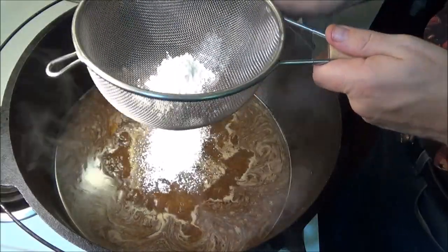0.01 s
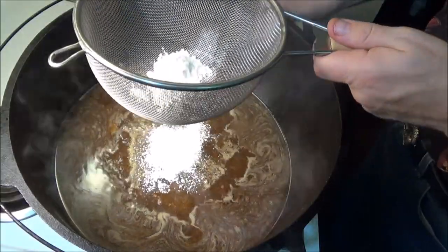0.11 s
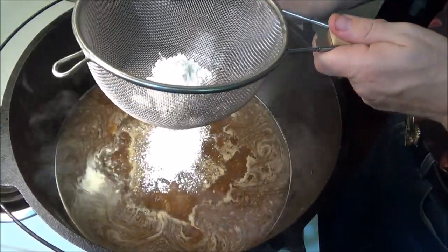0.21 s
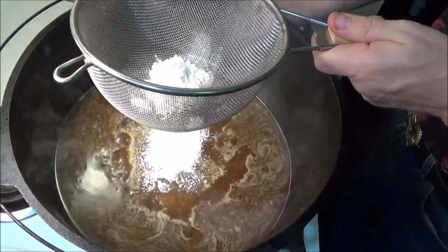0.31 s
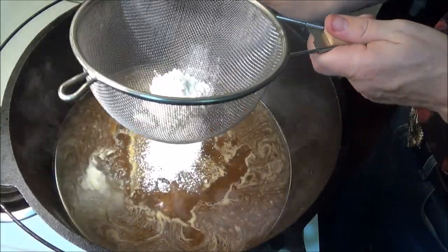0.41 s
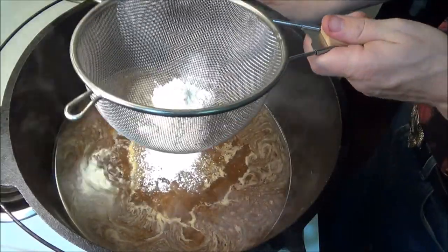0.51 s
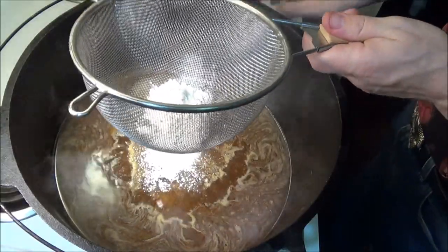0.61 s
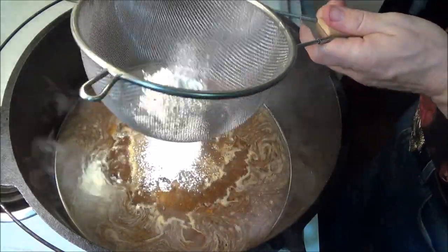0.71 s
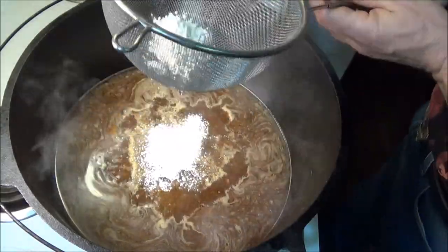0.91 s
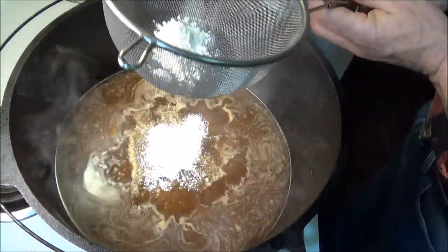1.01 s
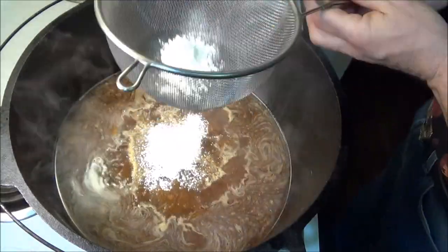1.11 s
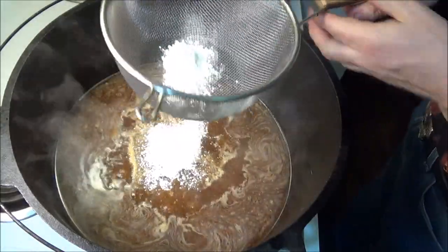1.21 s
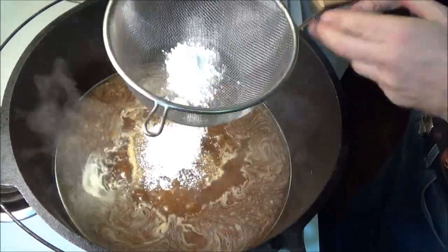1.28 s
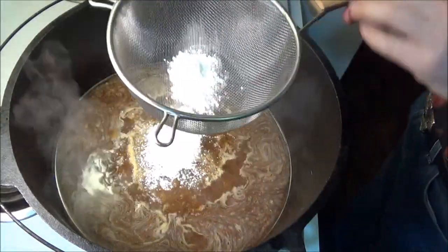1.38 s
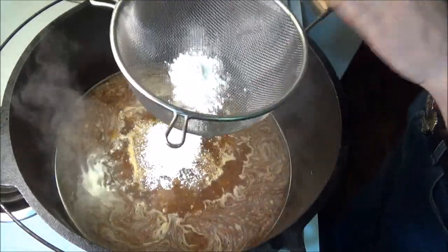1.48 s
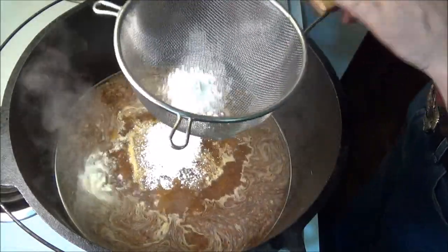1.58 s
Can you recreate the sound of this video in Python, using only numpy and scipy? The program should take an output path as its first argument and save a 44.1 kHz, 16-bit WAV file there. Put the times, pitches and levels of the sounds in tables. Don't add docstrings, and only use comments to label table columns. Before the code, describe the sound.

Two brief rattling knocks, the second darker, bounce around a kitchen; after a quiet gap with faint brushing, a hand lightly taps a mesh sieve near the stereo camera microphone above a gently hissing pot.

```python
import sys
import numpy as np
from scipy import signal
from scipy.fft import rfft, irfft
from scipy.io import wavfile
from scipy.ndimage import uniform_filter1d

SR = 44100
rng = np.random.default_rng(int(sys.argv[2]) if len(sys.argv) > 2 else 0)


def master_out(mix):
    frames = np.transpose(np.atleast_2d(mix))
    ceiling = np.clip(frames, -1, 1)
    pcm = np.round(ceiling * 32767).astype(np.int16)
    wavfile.write(sys.argv[1], SR, pcm)


def elevation(decibels):
    levels = np.asarray(decibels, float)
    return 10 ** (levels / 20)


N = 70560


def level(x, db):
    return x * elevation(db) / np.sqrt(np.mean(x ** 2) + 1e-30)


def read(table, hz):
    table = np.array(table, float)
    return np.interp(np.log(np.maximum(hz, 1)), np.log(table[:, 0]), table[:, 1])


def response(gain_db):
    cepstrum = irfft(gain_db * np.log(10) / 20)
    cepstrum[1:1024] *= 2
    cepstrum[1025:] = 0
    h = irfft(np.exp(rfft(cepstrum)))
    return h / np.sqrt(np.sum(h ** 2))


def bands(size):
    f = np.fft.rfftfreq(size, 1 / SR)
    noise = rfft(rng.standard_normal((2, size)))
    for hz in 25 * 2 ** np.arange(0, 9.6, 1 / 3):
        thirds_away = 3 * np.log2(np.maximum(f, 1) / hz)
        shape = np.cos(np.pi / 2 * np.clip(thirds_away, -1, 1)) ** 2
        yield hz, irfft(noise * shape, size)


def stereo(mid_side, side_db):
    return mid_side[0] + elevation(side_db) * mid_side[1] * np.array([[1], [-1]])


def walk(rate):
    hold = int(SR / rate)
    steps = np.repeat(rng.standard_normal(N // hold + 1), hold)
    return 4 / 3 * uniform_filter1d(uniform_filter1d(steps, hold), hold)[:N]


def grit(per_s, scatter_db):
    chance = rng.random((3, N))
    struck = chance[0] < per_s / SR
    sign = np.sign(chance[1] - .5)
    size = elevation(-scatter_db * np.log(chance[2] + 1e-9))
    return level(struck * sign * size, 0)


def wash(colour, db):
    flicker_db = .8
    # frequency in Hz, side against mid in dB.
    air_side = [(60, -34), (110, -20), (200, -22.5), (380, -14), (700, -12), (1290, -6), (2380, -5.5),
                (4400, -4.5), (8120, -11), (15000, -25)]
    total = 0
    for hz, pair in bands(N):
        gain = elevation(read(colour, hz) + flicker_db * walk(12.04))
        total = total + stereo(pair, read(air_side, hz) - 1.5) * gain
    return level(total, db)


def kitchen():
    # frequency in Hz, level in dB per Hz.
    rumble_colour = [(15, -59), (25, -35), (48, -8), (91, -11.5), (112, -9.5), (283, -4.5), (567, -10),
                     (772, -7.5), (2500, -20.5), (3250, -52), (5500, -120)]
    # frequency in Hz, level in dB per Hz.
    simmer_colour = [(1200, -8), (2500, 0), (5000, -3.5), (7500, -5), (10500, -0.5), (12000, -3),
                     (13500, -7), (15500, -11.5)]
    t = np.arange(N) / SR
    rumble = wash(rumble_colour + [(9000, -56)], -59.5)
    simmer = wash([(300, -50)] + simmer_colour, -64)
    hum = elevation(-71.5 + 3.5 * walk(8.04)) * np.sin(2 * np.pi * 60.5 * t)
    whine = elevation(-79) * np.sin(2 * np.pi * 15734 * t)
    return rumble + simmer + np.sqrt(2) * (hum + whine)


def room():
    # frequency in Hz, t60 in seconds.
    room_t60 = [(100, 1), (260, 0.96), (700, 0.24), (1840, 0.39), (4850, 0.3), (12800, 0.17)]
    # frequency in Hz, side against mid in dB.
    room_side = [(60, -18), (200, -15), (700, -8), (1300, -6.5), (2400, -9.5), (4400, -8), (8100, -11),
                 (15000, -20)]
    build_s = 0.0027
    late_db, late_t60_s, late_top_hz = -9.5, 0.84, 1490
    t = np.arange(SR) / SR

    def fade(t60):
        return 1000 ** (-t / t60) / np.sqrt(t60)

    tail = 0
    for hz, pair in bands(SR):
        late = elevation(late_db) / (1 + (hz / late_top_hz) ** 2) * fade(late_t60_s)
        decay = fade(read(room_t60, hz)) + late
        tail = tail + stereo(pair, read(room_side, hz) + 1.7) * decay
    tail = tail * (1 - np.exp(-t / build_s))
    return tail / np.sqrt(np.sum(tail ** 2) / 2)


def rubs():
    # middle in seconds, length in seconds, level in dB, centre in Hz, width in Hz.
    strokes = [
        (0.897, 0.018, -64.5, 10500, 4000),
        (0.968, 0.061, -67.5, 10400, 4000),
        (1.04, 0.11, -66.5, 2000, 4150),
        (1.106, .12, -66, 5040, 6000),
        (1.207, 0.12, -62.5, 8000, 7100),
        (1.323, 0.023, -65, 10000, 4000),
        (1.514, 0.054, -66.5, 9000, 6000),
    ]
    t = np.arange(N) / SR
    f = np.fft.rfftfreq(2048, 1 / SR)
    grain = grit(9000, 3)
    out = 0
    for middle, length, db, hz, width_hz in strokes:
        colour_db = -12 * np.minimum(((f - hz) / width_hz) ** 2, 4)
        swish = signal.fftconvolve(grain, response(colour_db))[:N]
        out = out + elevation(db) * swish * np.exp(-(2 * (t - middle) / length) ** 2)
    return out


def rings():
    # start in seconds, frequency in Hz, level in dB, swell in seconds, t60 in seconds.
    modes = [(.228, 494, -30, 0.018, 0.15), (.228, 2200, -33.5, 0.003, 0.086),
             (.232, 1696, -40, 0.016, 0.21), (.245, 403, -38.5, 0.012, 0.13),
             (.250, 704, -31.5, 0.0046, 0.071), (.258, 1014, -38.5, 0.012, 0.086),
             (.262, 1389, -38.5, 0.014, 0.23), (.282, 587, -41.5, 0.011, 0.13),
             (.232, 165.7, -42.5, 0.012, 0.22), (.310, 159.8, -40.5, 0.02, 0.16),
             (0.489, 139, -38.5, 0.014, 0.14), (.490, 377.4, -38, 0.006, 0.18),
             (.492, 1022, -41, .008, 0.064), (.495, 742, -36, .008, 0.13),
             (.501, 874.6, -31, 0.0091, 0.092), (.230, 256.3, -44, .012, 0.11),
             (.495, 1315, -42, 0.013, 0.12), (.532, 737, -34, 0.011, 0.081), (.530, 489, -46, 0.0065, 0.15),
             (1.557, 3610, -48, .003, 0.023), (1.558, 681, -55.5, .003, 0.033),
             (1.568, 2250, -47, .002, .07), (1.568, 2700, -52, 0.0018, .07),
             (1.573, 1864, -52, .003, 0.052)]
    waver_db = 3.5
    t = np.arange(N) / SR
    out = 0
    for start, hz, db, swell, t60 in modes:
        since = np.maximum(t - start, 0)
        rise = np.sin(np.pi / 2 * np.minimum(since / swell, 1)) ** 2
        decay = 1000 ** (-np.maximum(since - swell, 0) / t60)
        gain = elevation(db + waver_db * walk(60 + hz / 9))
        out = out + gain * rise * decay * np.sin(2 * np.pi * (hz * since + rng.random()))
    return elevation(0.5) * out


def clatter(contacts, colour):
    bottom_hz, top_hz = 98, 14700
    t = np.arange(N) / SR
    f = np.fft.rfftfreq(2048, 1 / SR)
    clicks = grit(8000, 1.5) + 0.57 * rng.standard_normal(N)
    low_edge = 1 + (bottom_hz / np.maximum(f, 10)) ** 4
    high_edge = 1 + (f / top_hz) ** 12
    edges_db = -20 * np.log10(low_edge * high_edge)
    out = np.zeros(N)
    for start, db, attack, length, tilt_db in contacts:
        since = np.maximum(t - start, 0)
        rise = np.minimum(since / attack, 1) ** 2
        fall = np.exp(-(np.maximum(since - attack, 0) / length) ** 2)
        push = clicks * elevation(db) * rise * fall
        brightness_db = tilt_db * np.log2(np.maximum(f, 100) / 1500)
        broad = response(read(colour, f) + edges_db + brightness_db)
        out += signal.fftconvolve(push, broad)[:N]
    return out


def sieve_taps():
    # start in seconds, level in dB, attack in seconds, rattle length in seconds,
    # brightness in dB per octave.
    sieve_contacts = [
        (1.7, -47, 0.0031, 0.0025, 4),
        (1.5570, -36.5, 0.0024, 0.0011, 0),
        (1.5610, -47.5, 0.00078, 0.0058, 1),
        (1.5685, -52, 0.00064, 0.0055, -2),
        (0.1147, -57.5, 0.0035, 0.0092, -2),
    ]
    # frequency in Hz, level in dB per Hz.
    sieve_colour = [(150, -18), (600, -2.5), (1300, -12.5), (2200, -5), (3600, -9), (5200, -10),
                    (9500, -6.5), (16000, -24)]
    return clatter(sieve_contacts, sieve_colour)


def second_clatter():
    # start in seconds, level in dB, attack in seconds, rattle length in seconds,
    # brightness in dB per octave.
    second_contacts = [
        (.4840, -34.5, 0.0039, .009, 4),
        (.4960, -27, 0.0014, 0.0086, 0.95),
        (.505, -35, 0.003, 0.013, -2.),
        (.536, -40.5, 0.0043, 0.0086, -3),
    ]
    # frequency in Hz, level in dB per Hz.
    second_colour = [(60, -20), (140, -7.5), (280, -15), (800, -2), (1700, -10.5), (3200, -15.5),
                     (9500, -27), (16000, -35.5)]
    return clatter(second_contacts, second_colour)


def first_clatter():
    # start in seconds, level in dB, attack in seconds, rattle length in seconds,
    # brightness in dB per octave.
    first_contacts = [
        (.2268, -28.5, 0.0015, 0.01, 1),
        (.243, -31, 0.0044, 0.017, -1.5),
        (.260, -36, 0.0023, .012, -3),
        (.286, -36.5, 0.0028, .012, -2.5),
        (.2240, -44, .002, .002, -0.5),
    ]
    # frequency in Hz, level in dB per Hz.
    first_colour = [(60, -31), (150, -9.5), (310, -13.5), (500, -1.5), (1700, -1.5), (4000, -7.5),
                    (10800, -11.5), (16000, -22.5)]
    return clatter(first_contacts, first_colour)


def scene():
    wet_db = (1.5, -0.5, -7)
    balance_db = 0.47
    things = [first_clatter(), second_clatter(), sieve_taps()]
    swish, ring = rubs(), rings()
    sent = sum(elevation(db) * thing for db, thing in zip(wet_db, things))
    sent = sent + elevation(-8) * ring + elevation(-3.5) * swish
    echo = signal.fftconvolve(sent[None], room(), axes=1)[:, :N]
    balance = elevation(np.array([[balance_db], [-balance_db]]))
    return (sum(things) + ring + swish + echo) * balance + kitchen()


def top_cut(x):
    return signal.sosfilt(signal.butter(12, 16480, fs=SR, output="sos"), x)


def record(dry):
    soft_top, top_hz = .3, 15900
    soft = soft_top * np.tanh(dry / soft_top)
    low_pass = signal.ellip(8, .2, 50, top_hz, fs=SR, output="sos")
    mix = signal.sosfilt(low_pass, soft)
    return top_cut(mix)


dry = scene()
out = record(dry)
master_out(out)
```